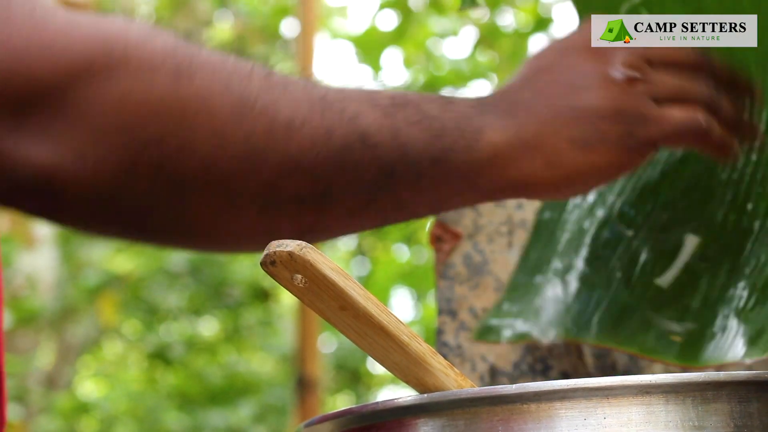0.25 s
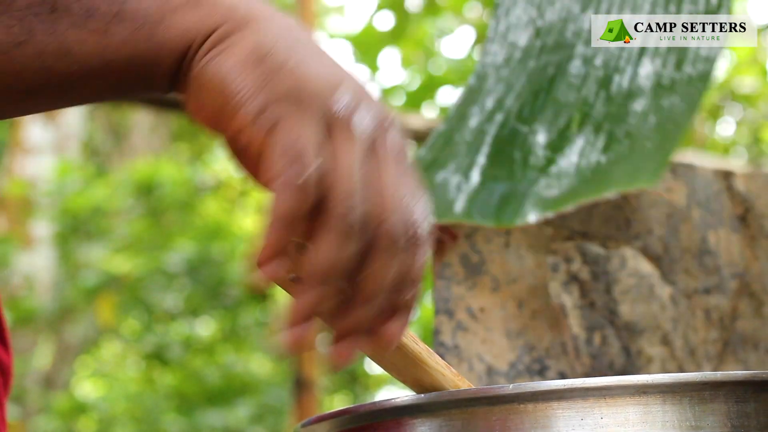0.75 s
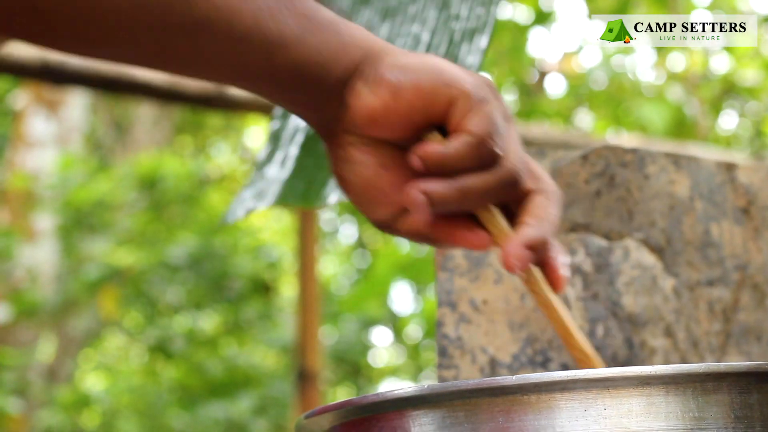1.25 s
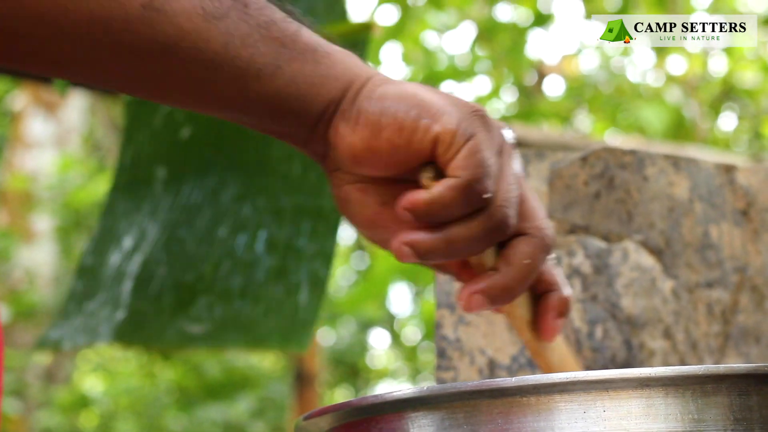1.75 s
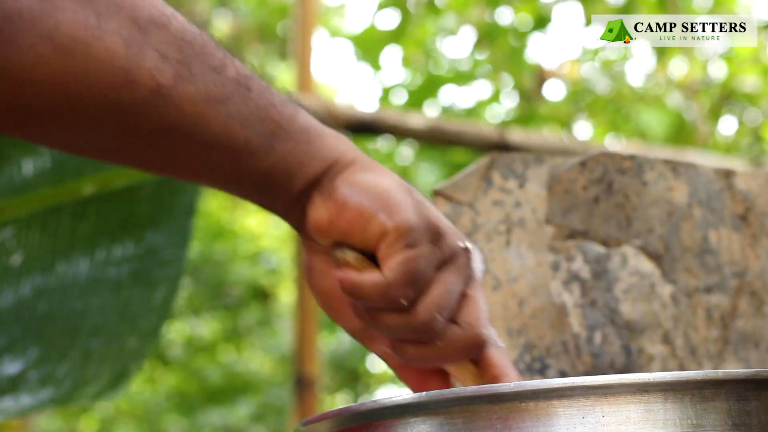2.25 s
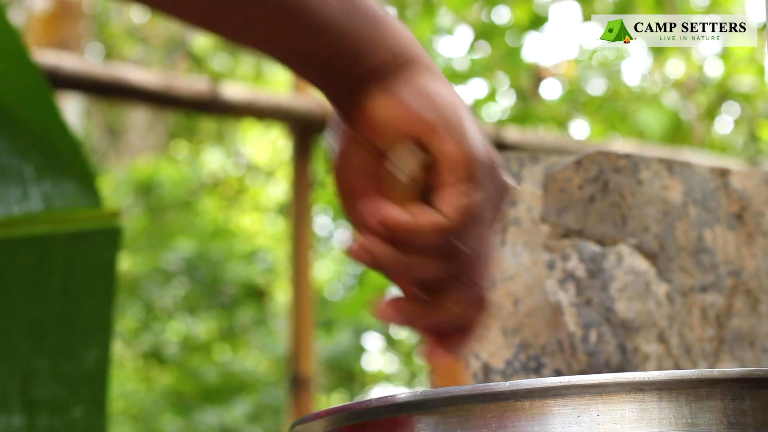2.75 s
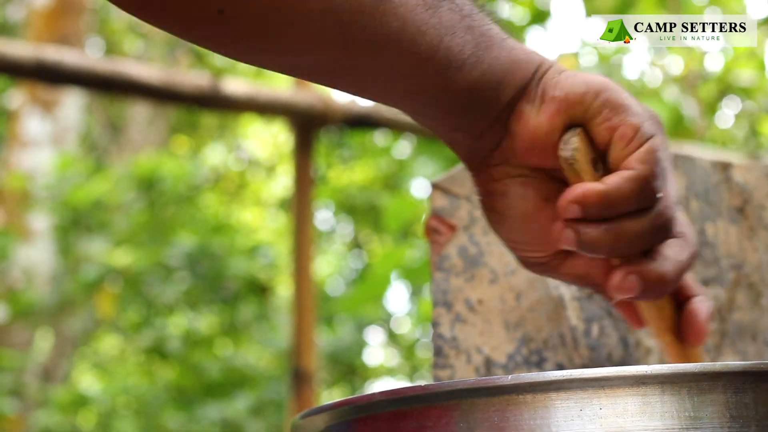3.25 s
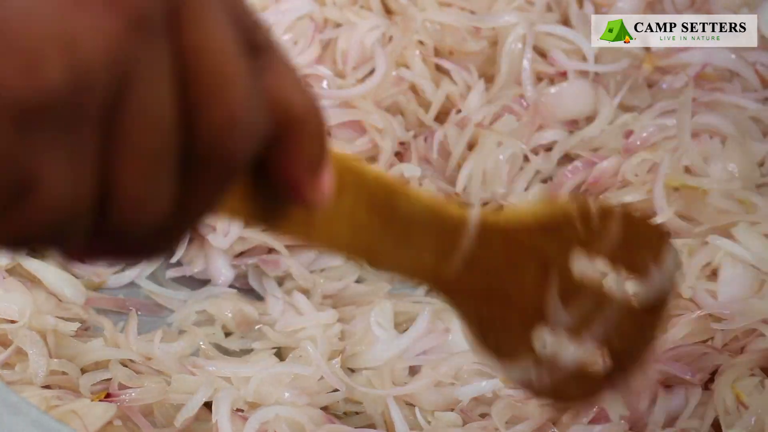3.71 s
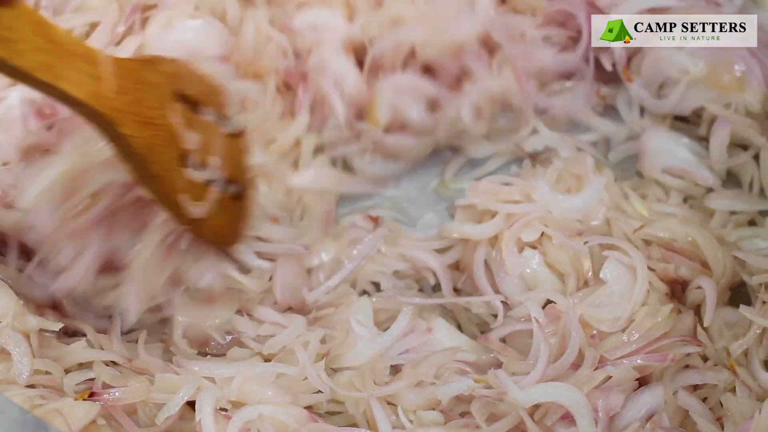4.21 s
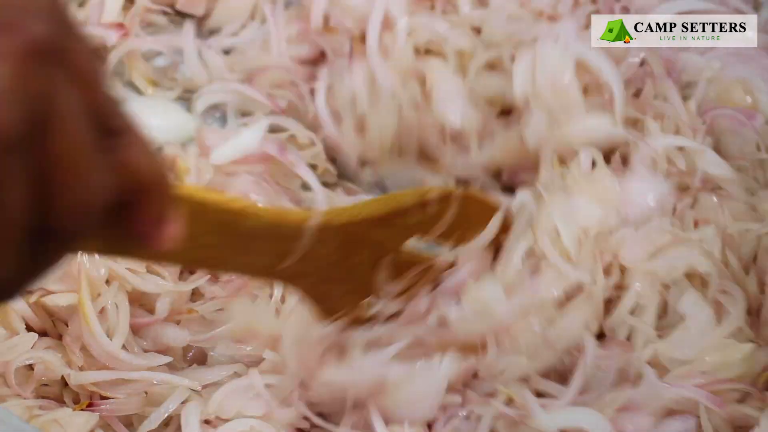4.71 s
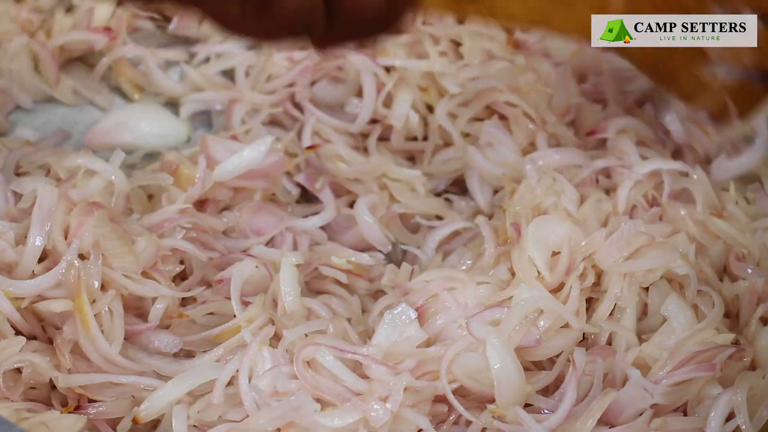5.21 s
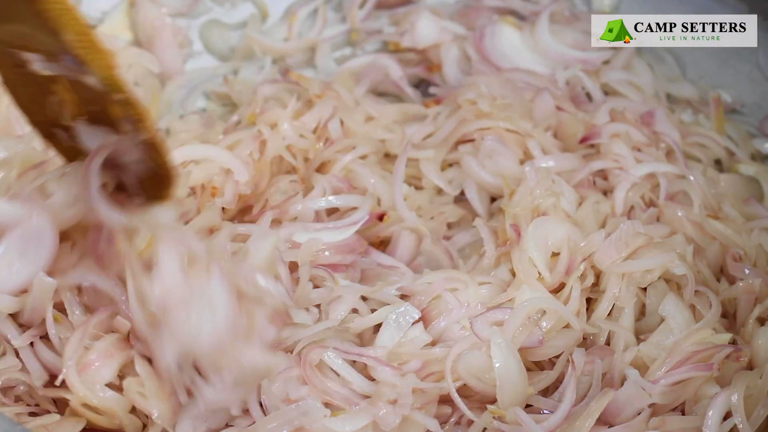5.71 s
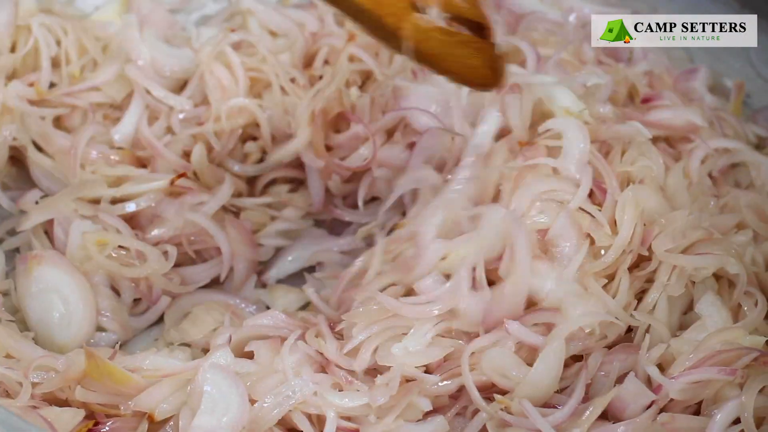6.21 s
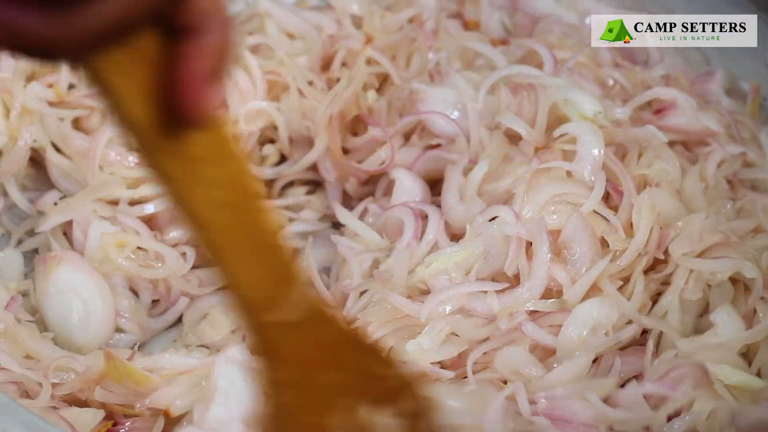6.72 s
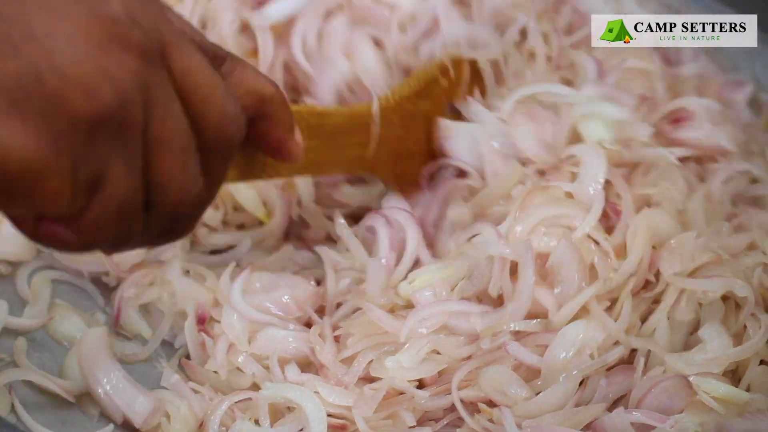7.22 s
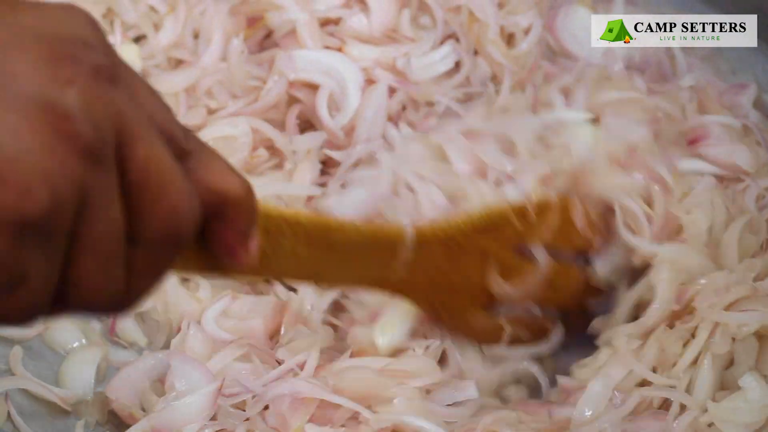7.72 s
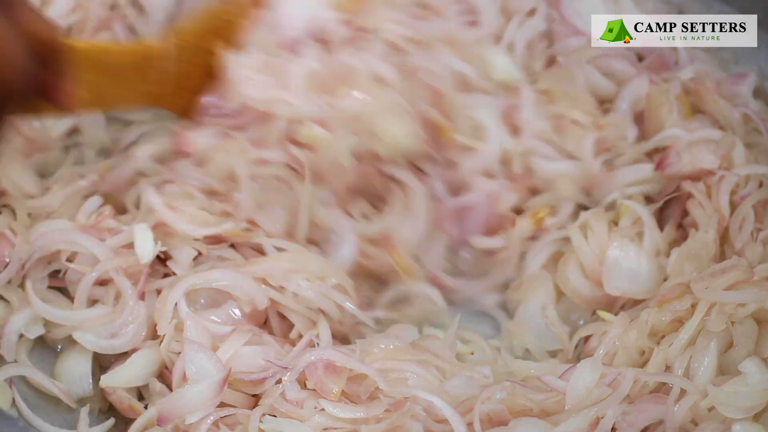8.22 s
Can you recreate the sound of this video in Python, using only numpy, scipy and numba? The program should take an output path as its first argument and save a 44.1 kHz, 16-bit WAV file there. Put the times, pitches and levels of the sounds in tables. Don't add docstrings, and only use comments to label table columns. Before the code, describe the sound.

Wet sliced onions fry in hot oil in a wide metal pan outdoors, heard very close: a dense, bright, hissing sizzle with sharp spits, flaring and dipping as a wooden spatula scrapes and thuds on the bottom. Low fire and forest rumble sits beneath. Around 3.4 seconds it cuts abruptly to a far quieter, duller, steadier sizzle, swelling with each stir, with small pops and faint knocks.

```python
import sys
import numpy as np
from scipy import signal
from scipy.fft import rfft, irfft
from scipy.io import wavfile
from scipy.ndimage import uniform_filter1d, map_coordinates
from numba import njit

SR = 44100
rng = np.random.default_rng(int(sys.argv[2]) if len(sys.argv) > 2 else 0)


def output_pcm(signal):
    pcm = np.clip(np.atleast_2d(signal).T, -1, 1) * 32767
    wavfile.write(sys.argv[1], SR, np.round(pcm).astype(np.int16))


def to_linear_factor(level_db):
    exponent = np.asarray(level_db, float) / 20
    return 10 ** exponent


N = 373086
CUT_S = 3.4065


def unit(x):
    return x / np.sqrt(np.mean(x ** 2))


def colour(x, table, hollows=()):
    hz, db = np.transpose(table)
    f = np.fft.rfftfreq(len(x), 1 / SR) + 1
    humps = sum(gain / (1 + (2 * (f - centre) / width) ** 2) for centre, width, gain in hollows)
    gain_db = np.interp(np.log(f), np.log(hz), db) + humps
    return irfft(rfft(x) * to_linear_factor(gain_db), len(x))


def walk(rate):
    hold = int(SR / rate)
    steps = np.repeat(rng.standard_normal(N // hold + 1), hold)
    smooth = uniform_filter1d(uniform_filter1d(steps, hold), hold)
    return unit(smooth[:N])


@njit
def ring(count, s, hz, t60, glide, size):
    y = np.zeros(count)
    for k in range(len(s)):
        steps = int(t60[k] * SR) + 2
        p = np.exp(2j * np.pi * hz[k] / SR - np.log(1000) / steps)
        turn = np.exp(2j * np.pi * hz[k] * glide[k] / steps / SR)
        z = size[k] + 0j
        start = int(s[k] * SR)
        for i in range(start, min(start + steps * 3 // 4, count)):
            y[i] += z.imag * min((i - start) * hz[k] / SR / 2, 1.)
            z *= p
            p *= turn
    return y


def surge(events, reach_oct, when, hz):
    gain = 0
    for s, db, half, mid in events:
        tighter = 1 + 0.14 * abs(np.log2(mid / 3000))
        late = (when - s) / half
        away = np.log2(hz / mid) / reach_oct * tighter
        gain = gain + db * np.exp(-late ** 2 / 2 - away ** 2 / 2)
    return gain


def boil(s, events, reach_oct, drying_db, sizes_hz, per_ms, cycles, scatter_db, burst_db, patch_db, ring_spread):
    span = s[-1] - s[0]
    when, pitch, luck, sign, shape = rng.random((200000, 5))[:int(1000 * per_ms * span)].T
    when = max(s[0] - .03, 0) + (span + .05) * when
    hz = (14 + 116 * pitch) ** 2
    at = np.clip(when * SR, 0, N - 1).astype(int)
    place = np.interp(np.log(hz), np.log(sizes_hz), np.arange(len(sizes_hz)))
    swell = np.array([patch_db * walk(30)[at] for _ in sizes_hz])
    db = map_coordinates(swell, [place, np.arange(len(hz))], order=1)
    db = db + surge(events, reach_oct, when, hz)
    db = db + drying_db * (when - np.mean(s)) * np.clip(hz / 8000, 0, 1)
    db = db + burst_db * np.clip(hz / 8000, .3, 1) * walk(550)[at]
    db = db - scatter_db * np.log(1 - .997 * luck)
    damping = np.clip(hz / 1500, .35, 1)
    size = np.sign(sign - .5) * to_linear_factor(db) * hz ** 0.66 / np.sqrt(damping)
    turns = cycles * (1 - 0.909 * shape) ** -ring_spread * damping
    return ring(N, when, hz, turns / hz, 0 * hz + 0.066, size)


def near_frying(close):
    # middle in seconds, gain in dB, half
    # length in seconds, bubble pitch in Hz.
    near_flares = [(.04, 5, .07, 700), (0.143, 3.5, 0.077, 7500), (0.756, 2.5, .08, 4000),
                   (0.963, 2, 0.093, 700), (1.062, 5.5, .07, 13400), (1.24, 4, 0.11, 1600),
                   (1.298, 2, .04, 8000), (1.61, 2, 0.12, 4500), (1.74, 2, 0.08, 600),
                   (1.882, 2.5, .05, 10200), (1.996, 2, 0.047, 2500), (2.037, 2.5, 0.023, 10500),
                   (2.27, 1, 0.097, 14500), (2.65, 1.5, 0.034, 5000), (2.184, 2.5, 0.076, 7600),
                   (2.226, 1.5, .04, 3500), (2.8, 3.5, 0.03, 1000), (3.027, 4, .06, 12000),
                   (3.246, 1, 0.1, 13000), (3.195, 3, 0.092, 1990), (3.152, 4, 0.13, 7600),
                   (0.896, 1, 0.043, 2000)]
    # middle in seconds, gain in dB, half length in
    # seconds, bubble pitch in Hz.
    near_lulls = [(0.076, -3.5, 0.071, 2000), (0.263, -6, 0.039, 550), (.51, -3.5, 0.053, 4780),
                  (1.394, -3, 0.027, 2000), (1.397, -2, 0.026, 6460), (1.428, -3, 0.036, 520),
                  (.74, -2, .05, 480), (1.554, -0.5, 0.058, 9000), (1.7, -2, 0.05, 14000),
                  (2.066, -6.5, 0.051, 650), (2.095, -4.5, .03, 4300), (2.54, -4.5, 0.11, 13000),
                  (2.653, -6.5, .06, 510), (2.853, -2.5, 0.043, 9400), (3.366, -4, 0.025, 9000),
                  (3.1, -5.5, 0.23, 10000), (.2, -2.5, 0.061, 12000), (1.573, 0, 0.05, 550),
                  (2.38, -4, 0.019, 2000), (2.923, 0.5, 0.12, 15500)]
    near_sizes = (700, 2200, 8200, 12000)
    near_span = (0., 3.4)
    # pitch in Hz, level in dB.
    near_tone = [(120, -44), (200, -20.5), (450, -12.5), (1030, -6.5), (1550, -5), (1750, -3), (3500, -.5),
                 (4600, -1.5), (7500, 1.5), (9000, 2.5), (10500, -2), (12300, -8), (15600, -16)]
    # pitch in Hz, width in Hz, gain in dB.
    near_air = [(1234, 52, 5.3), (2080, 76, 3.3), (3110, 72, 2.2)]
    bubbles = boil(near_span, near_flares + near_lulls, 0.87, 0, near_sizes, per_ms=32., cycles=15.7,
                   scatter_db=1.5, burst_db=1.0, patch_db=0.73, ring_spread=0.6)
    sizzle = colour(bubbles, near_tone, near_air)
    return to_linear_factor(-16.5) * sizzle / np.std(sizzle[close])


def rumble(table, db):
    return to_linear_factor(db + 0.64 * walk(2.76)) * unit(colour(rng.standard_normal(N), table))


def fire_and_forest(close):
    # pitch in Hz, level in dB per Hz.
    near_rumble = [(12, -45), (20, -5), (64, 9.5), (125, 12), (261, 3.5), (319, -2), (400, -46), (520, -32),
                   (880, -120)]
    # pitch in Hz, level in dB per Hz.
    far_rumble = [(12, -56), (20, -26), (59, -20), (85, -14.5), (145, -12.5), (178, -10.5), (300, -13.5),
                  (390, -37), (660, -120)]
    return np.where(close, rumble(near_rumble, -51), rumble(far_rumble, -64.5))


def scrapes():
    # start in seconds, length in seconds, level in dB.
    strokes = [(-.03, 0.16, -40), (.4, 0.12, -49), (.87, 0.35, -39.5), (1.706, 0.18, -43),
               (2.132, 0.252, -40.5), (2.8, .16, -41), (2.98, .3, -50), (3.3, 0.13, -41.5)]
    # pitch in Hz, level in dB.
    bottom_hum = [(100, -22), (200, -11), (380, -12), (480, -4), (640, 0), (800, -11), (1200, -37)]
    edge_s = 0.027
    t = np.arange(N) / SR
    drag = np.zeros(N)
    for s, length, db in strokes:
        drag += to_linear_factor(db) * np.clip(np.minimum(t - s, s + length - t) / edge_s, 0, 1)
    stutter = to_linear_factor(2.3 * walk(60)) * rng.standard_normal(N)
    return drag * unit(colour(stutter, bottom_hum))


def spits():
    # start in seconds, peak in dB, pitch in Hz.
    near_drops = [(0.172, 3, 7970), (.2379, 5.5, 8980), (.3242, 0, 9500), (0.336, 7, 7800),
                  (.3755, 4, 7500), (0.5872, -1, 3970), (.7033, 3, 7000), (.7467, -9, 2350),
                  (2.364, 2, 10100), (.8285, -8, 2160), (1.138, -1, 2470), (1.1827, 1, 3830),
                  (1.2221, 3, 8550), (1.2307, -2, 3220), (1.7355, -8, 2080), (1.7474, -4.5, 3880),
                  (1.869, 5, 7840), (1.8944, 3, 7800), (1.9125, 2, 7900), (1.9719, 0, 4530),
                  (2.17, -2, 6350), (2.4693, -5, 3100), (2.48, -2, 3800), (2.653, -1.5, 3230),
                  (2.802, -4.5, 2060), (3.044, 4, 8250), (3.1255, 4, 7800), (3.1293, 3, 3800),
                  (3.1982, 6, 7500), (2.7272, -2, 9000)]
    # start in seconds, peak in dB, pitch in Hz.
    far_drops = [(4.4955, -23, 2650), (5.1602, -19, 2590), (5.5042, -13.5, 2450), (5.554, -27, 6440),
                 (5.913, -20, 2480), (5.9636, -16, 2540), (6.025, -14, 2700), (6.215, -18, 2500),
                 (6.5613, -17, 2500), (7.0015, -19, 3600), (7.3764, -22, 2500), (7.8309, -21, 2540),
                 (8.1043, -31, 2760)]
    s, db, hz = np.repeat(np.transpose(near_drops + far_drops), 9, axis=1)
    late, detune = rng.random((len(s), 2)).T
    hz = hz * (1 + 0.32 * np.clip(hz / 6000, .45, 1.3) * (detune - .5))
    cycles, spread_s = 43.0, .002
    return ring(N, s + spread_s * late, hz, cycles / hz, 0 * hz + .05, to_linear_factor(db - 13))


def spatula():
    # start in seconds, peak in dB, bottom pitch in Hz,
    # edge tick in dB, slap in dB.
    knocks = [(.847, -19.5, 399, -6, -2.5), (0.884, -27, 505, -2, -10), (0.912, -21.5, 376, -10, -9),
              (1.046, -33, 533, -20, -12), (1.704, -30, 400, -20, -17), (1.729, -31, 395, -20, -5),
              (1.759, -23, 393, -13, -11), (2.241, -28, 550, -20, -13), (2.777, -21, 391, -22, -4.5),
              (5.229, -37, 328, -25, -7), (5.252, -35, 410, -24, -3), (7.003, -42.5, 400, 5.5, 2),
              (7.641, -39, 800, -18, -15), (7.644, -40, 294, -20, -7), (7.663, -42, 255, -20, -13),
              (7.853, -45, 360, -14, -2)]
    # multiple of its pitch, level in dB, time to fall 60 dB in seconds.
    bottom_rings = [(.55, -3.5, 0.053), (1, 13.5, 0.072), (1.12, -15, .05), (1.45, -4, 0.089),
                    (1.85, 2.5, 0.085), (2.4, -18, 0.037)]
    # pitch in Hz, level in dB, time to fall 60 dB in seconds.
    edge_rings = [(1230, -12, .04), (1810, 12, 0.04), (2150, 0, .03), (3100, -5, .02)]
    # pitch in Hz, level in dB.
    slap_tone = [(150, -44), (300, 7), (500, 10), (1000, -13), (2000, 2), (3500, -3), (5000, -40)]
    push_s = 0.0037
    out, age = np.zeros(N), np.arange(8192) / SR
    hz, db, t60 = np.array(edge_rings).T
    tick = ring(len(age), 0 * hz, hz, t60, 0 * hz, to_linear_factor(db))
    for s, peak_db, pitch, tick_db, slap_db in knocks:
        multiple, db, t60 = np.array(bottom_rings).T
        hz = pitch * multiple
        thud = ring(len(age), 0 * hz, hz, t60, 0 * hz, to_linear_factor(db))
        thud *= 1 - np.exp(-age / push_s)
        slap = unit(colour(rng.standard_normal(len(age)), slap_tone))
        slap *= np.exp(-age / 0.019) * (1 - np.exp(-age / 0.00079))
        knock = thud / np.abs(thud).max() + to_linear_factor(tick_db) * tick + to_linear_factor(slap_db) * slap
        start = int(s * SR)
        out[start:start + len(age)] += to_linear_factor(peak_db) * knock
    return out


def far_frying(close):
    # middle in seconds, gain in dB, half length in seconds, bubble pitch
    # in Hz.
    far_strokes = [(3.56, 7.5, .045, 4000), (4.153, 3, 0.061, 2300), (4.38, 2, 0.14, 9000),
                   (4.684, 5, 0.11, 2780), (5.1, 1, 0.11, 2500), (5.623, 4.5, 0.14, 2880),
                   (6.01, 5.5, 0.082, 2000), (6.137, 1.5, 0.027, 8000), (6.24, 4, .035, 2000),
                   (6.85, 1.5, 0.046, 2500), (7.015, 3.5, 0.035, 2500), (7.39, 3.5, 0.096, 2800),
                   (7.818, 4.5, 0.082, 3300), (8.338, 3.5, .07, 3020)]
    # middle in seconds, gain in dB, half length in
    # seconds, bubble pitch in Hz.
    far_lulls = [(3.777, -0.5, .07, 1800), (5.817, -3.5, 0.15, 10000), (6.243, -2.5, 0.05, 5500),
                 (7.596, -2, 0.097, 8000), (8.075, -2, 0.064, 2000)]
    far_sizes = (1000, 2700, 6500, 11500)
    far_span = (3.42, 8.46)
    # pitch in Hz, level in dB.
    far_tone = [(88, -50), (200, -17), (380, -10.5), (1400, -14), (1750, -7.5), (2300, -6.5), (3200, -6.5),
                (3850, -10.5), (4700, -12.5), (5500, -10), (7100, -10), (8550, -12), (9800, -27),
                (15000, -46),
                (15060, -60), (15160, -90)]
    # pitch in Hz, width in Hz, gain in dB.
    far_air = [(2500, 210, 3.5), (2676, 235, 4.5), (1320, 91, 3), (594, 69, -1), (5990, 280, 3.5),
               (6420, 470, 3.5)]
    drying_db = -0.54
    bubbles = boil(far_span, far_strokes + far_lulls, 1.47, drying_db, far_sizes, per_ms=35., cycles=23.3,
                   scatter_db=-0.6, burst_db=-0.2, patch_db=0.26, ring_spread=0.25)
    sizzle = colour(bubbles, far_tone, far_air)
    return to_linear_factor(-34) * sizzle / np.std(sizzle[~close])


def scene():
    close = np.arange(N) < CUT_S * SR
    frying = np.where(close, near_frying(close), far_frying(close))
    mix = frying + fire_and_forest(close) + scrapes() + spits() + spatula()
    return mix[None]


def roll_off(x):
    return signal.sosfilt(signal.butter(12, 16330, fs=SR, output="sos"), x)


def record(dry):
    soft = np.tanh(1.125 * dry) / 1.082
    soft = signal.sosfilt(signal.butter(2, 22, "high", fs=SR, output="sos"), soft)
    soft = signal.sosfilt(signal.ellip(12, .2, 90, 15720, fs=SR, output="sos"), soft)
    soft = soft * np.clip((N - np.arange(N)) / (.002 * SR), 0, 1)
    return roll_off(soft)


dry = scene()
out = record(dry)
output_pcm(out)
```